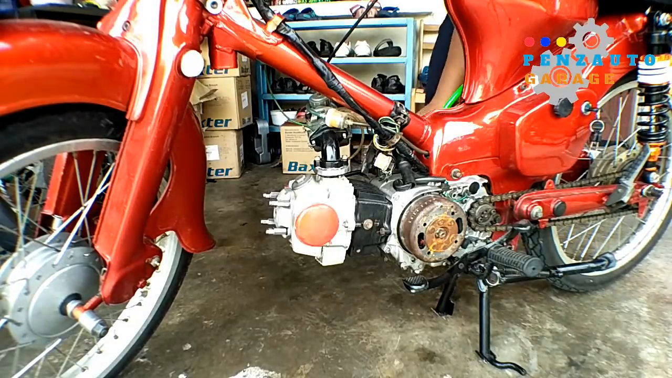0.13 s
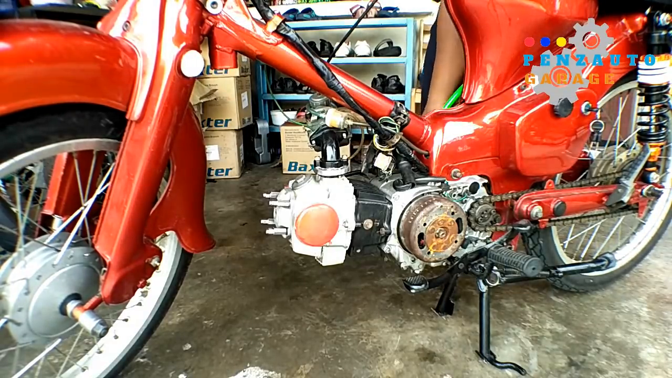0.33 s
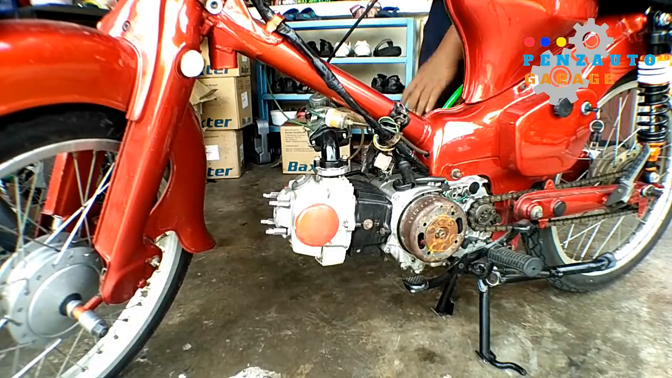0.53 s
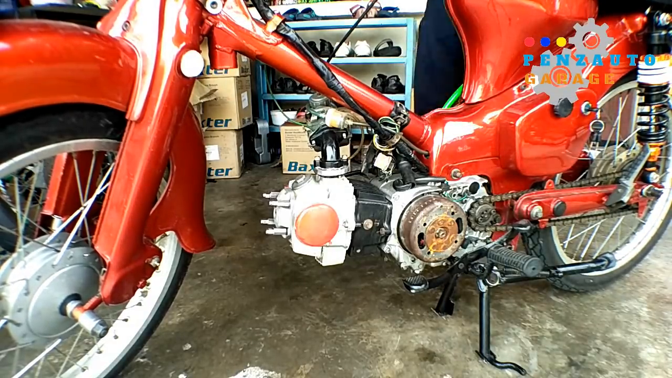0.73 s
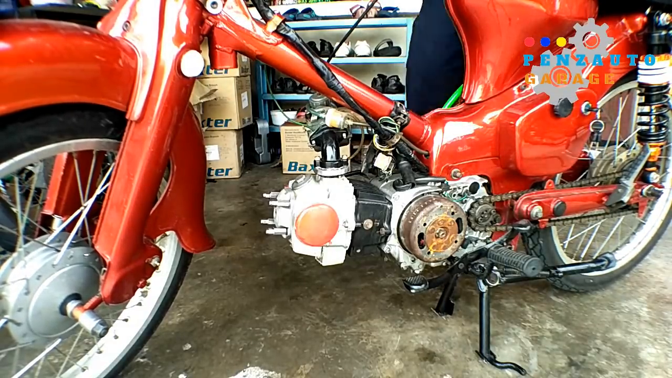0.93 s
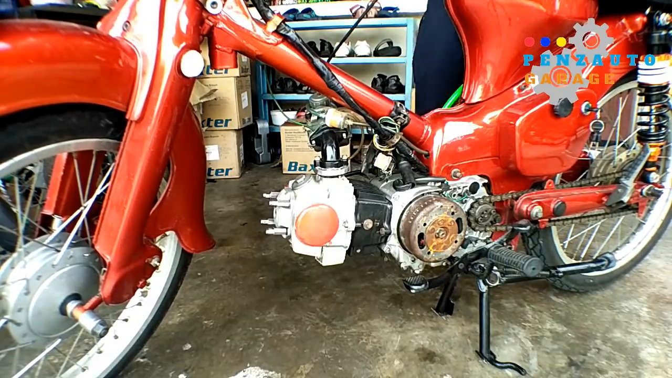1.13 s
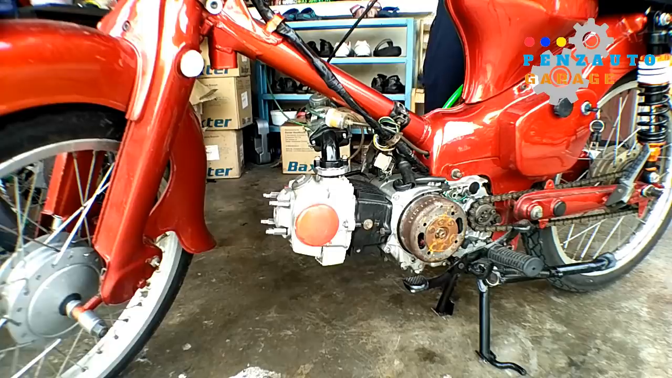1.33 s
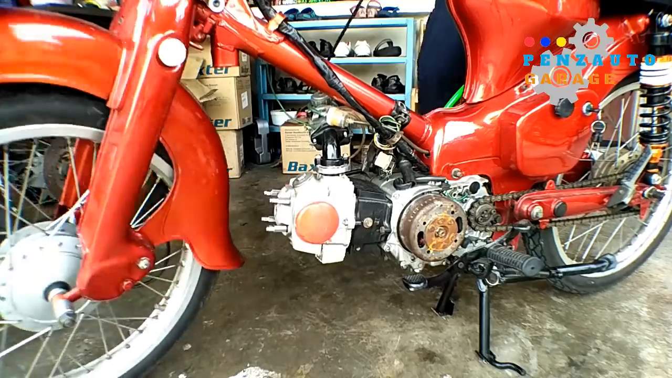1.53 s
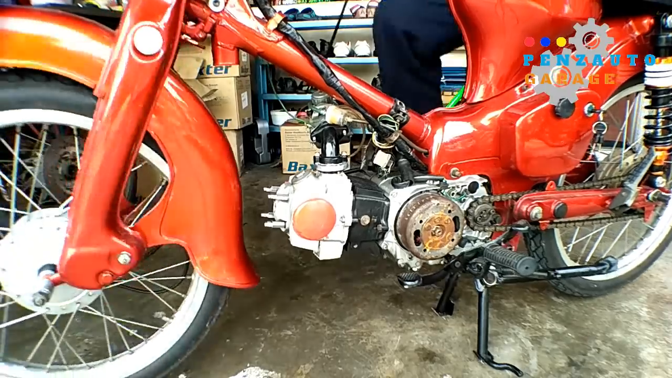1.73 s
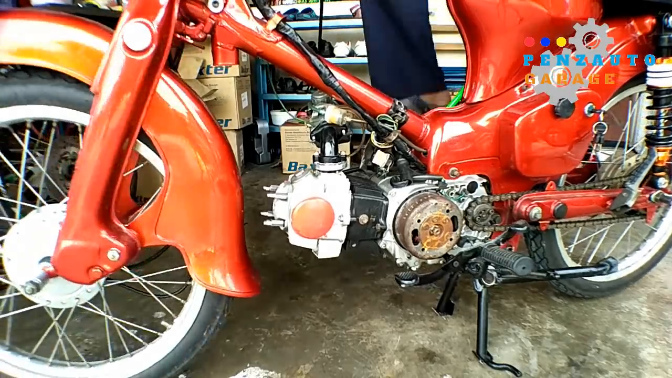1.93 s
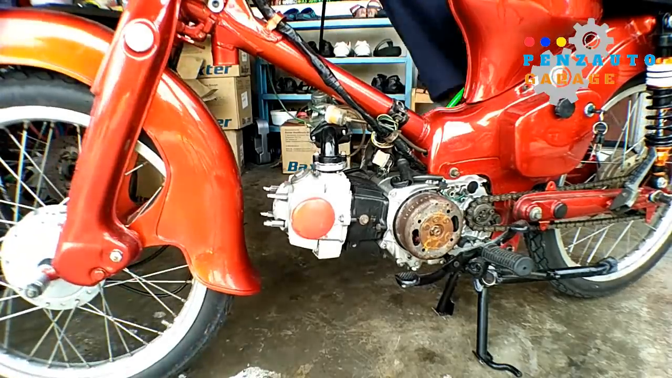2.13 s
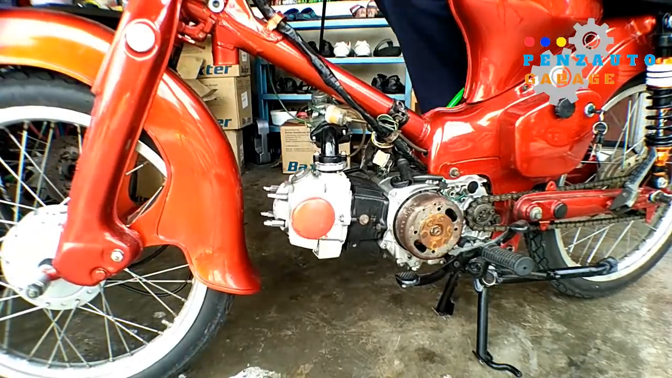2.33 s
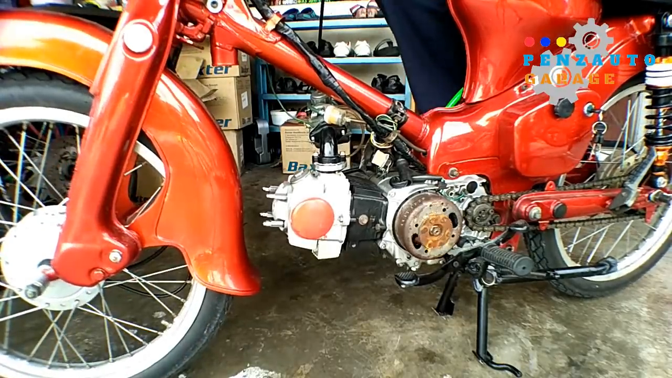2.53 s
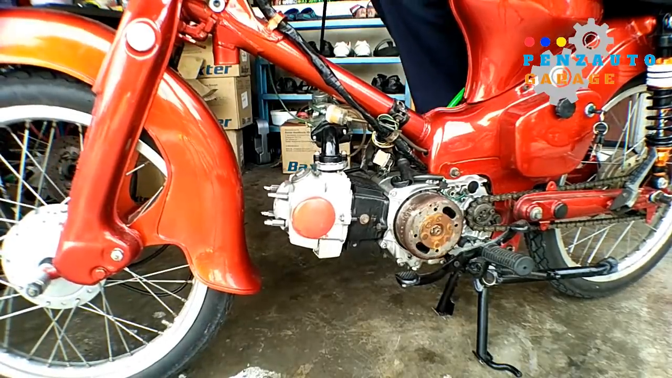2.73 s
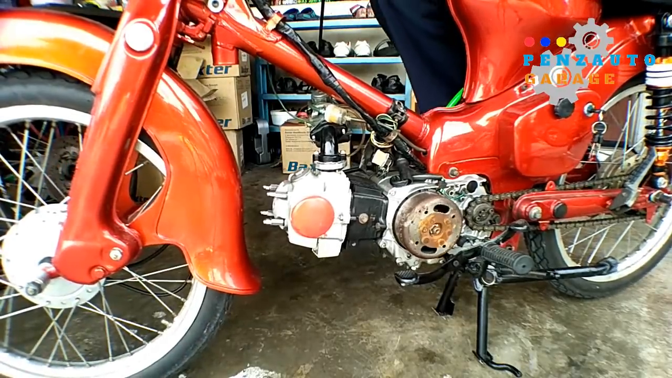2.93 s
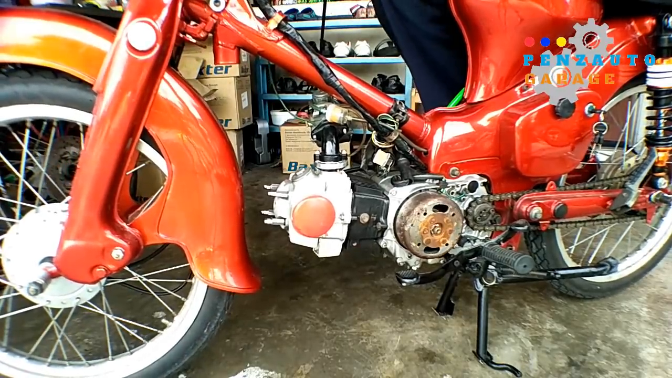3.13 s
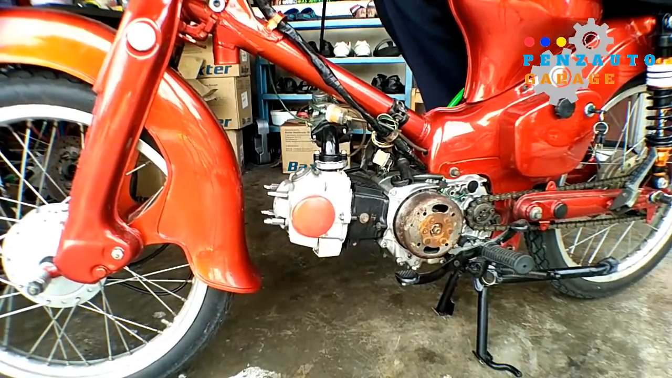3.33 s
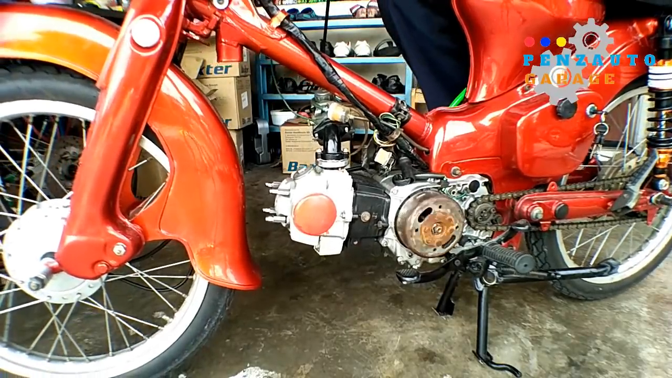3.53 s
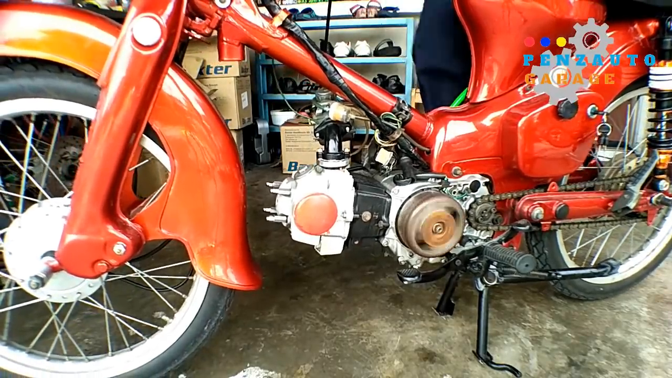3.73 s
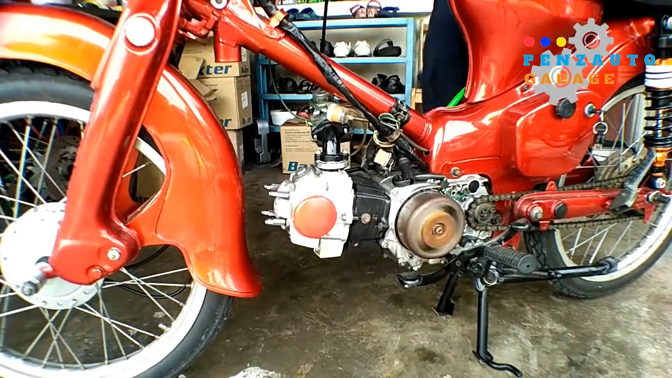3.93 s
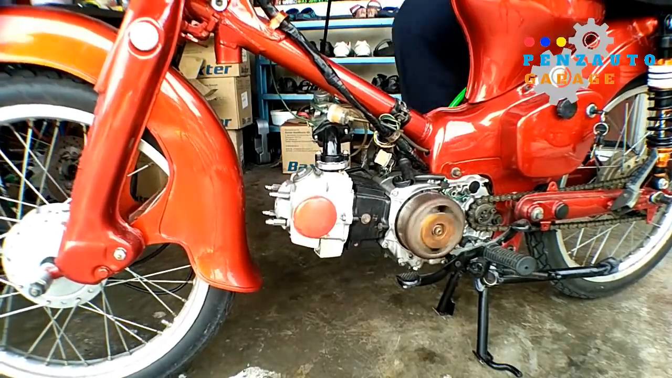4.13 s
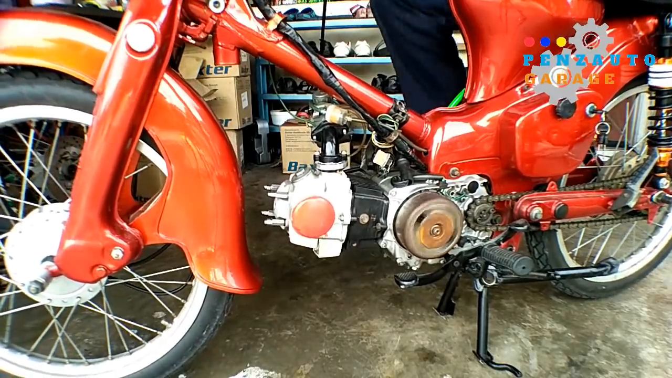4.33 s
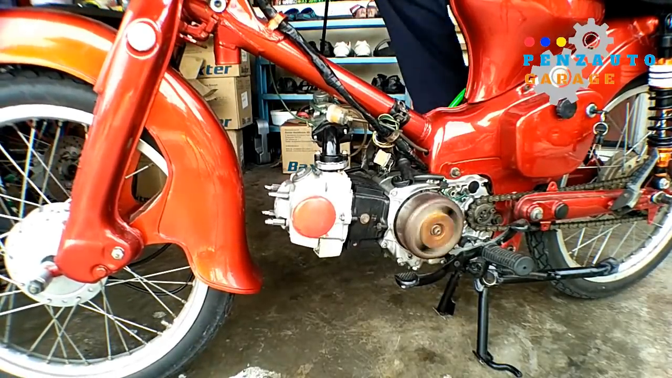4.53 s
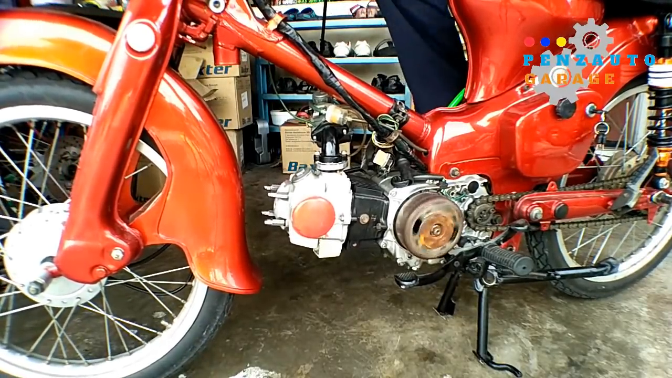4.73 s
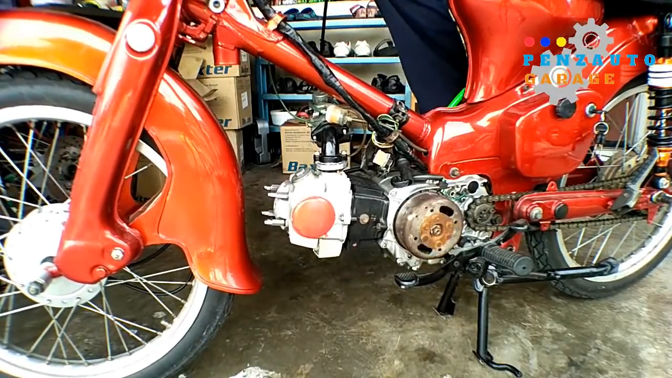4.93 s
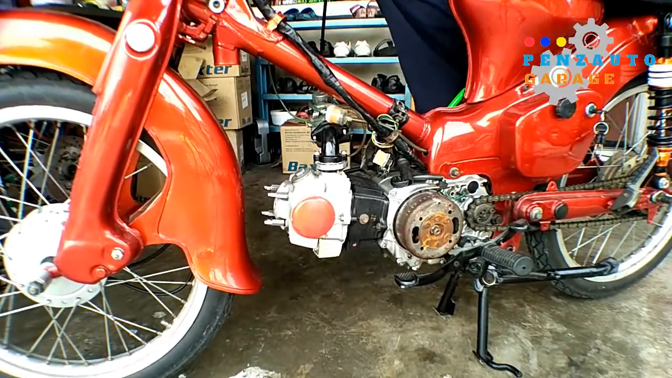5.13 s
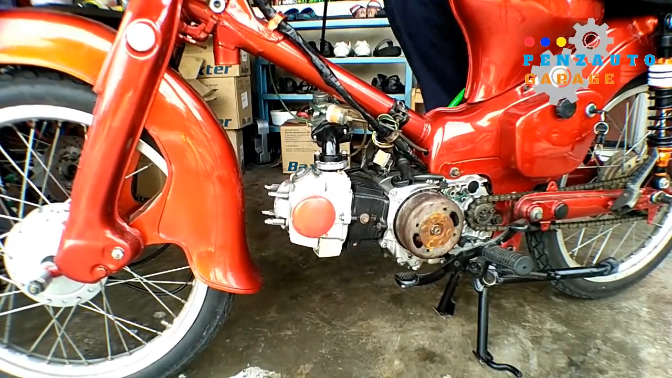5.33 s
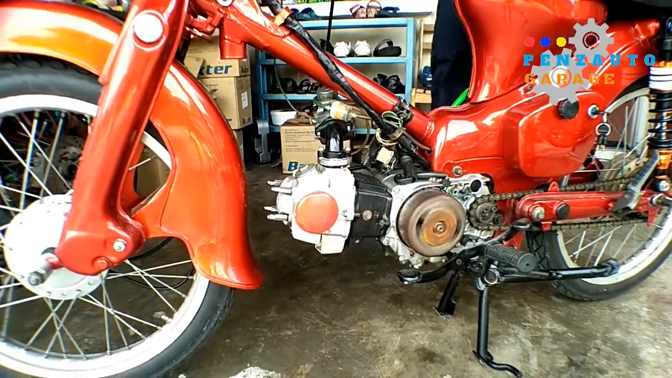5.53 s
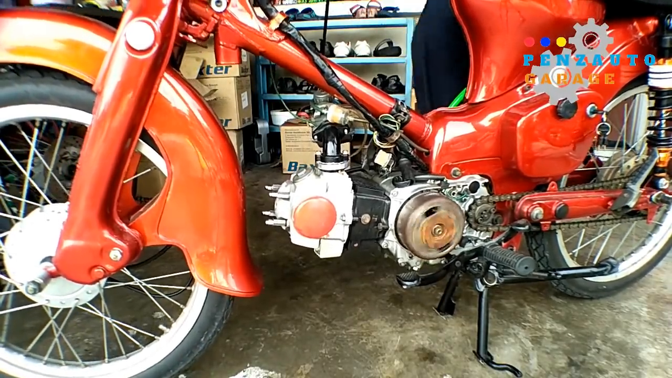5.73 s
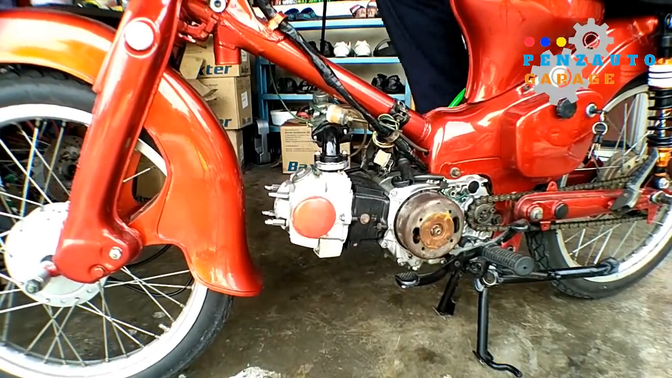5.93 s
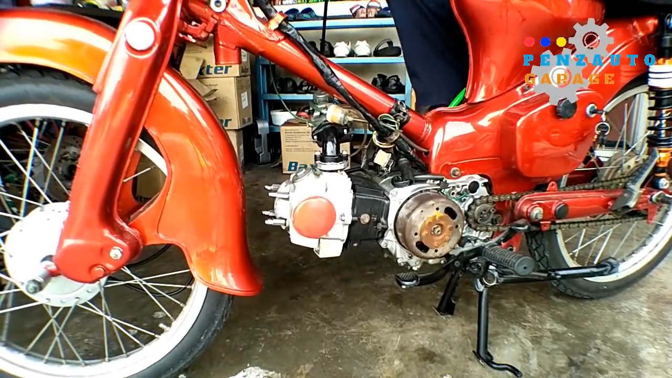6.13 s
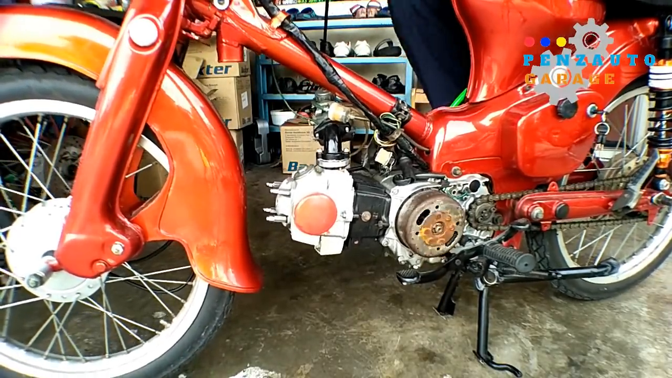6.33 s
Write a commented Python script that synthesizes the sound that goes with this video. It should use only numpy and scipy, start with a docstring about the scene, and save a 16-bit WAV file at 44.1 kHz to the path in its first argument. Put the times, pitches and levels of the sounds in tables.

```python
"""Kick-starting a small motorcycle

A small single-cylinder motorcycle is rocked on its stand and kick-started twice in a workshop.
Each firing is a swelling, dying gas pulse that thumps through the silencer; the loudest thumps clip.
Valve gear, chain and bare flywheel are shaped noise; lever and stand knocks ring the frame.
Scuffs, scrapes, a boom and a whirr are bands of noise; distant traffic drones as narrow noise."""
import sys
import numpy as np
from scipy import signal
from scipy.fft import rfft, irfft, next_fast_len
from scipy.io import wavfile
from scipy.ndimage import map_coordinates

SR = 44100
rng = np.random.default_rng(int(sys.argv[2]) if len(sys.argv) > 2 else 0)


def store_wav(level_fs):
    """Save 16-bit WAV to argv[1]."""
    pcm = np.round(np.clip(np.atleast_2d(level_fs), -1, 1) * 32767)
    wavfile.write(sys.argv[1], SR, pcm.T.astype(np.int16))


def gain_from_db(level_db):
    """Turn a decibel level (scalar or array-like) into a linear amplitude factor."""
    decades = np.asarray(level_db, float) / 20
    return 10 ** decades


N = 281358   # length in samples

# clacks of valve gear in the running engine:
# (start_s, relative crack_db, clatter_db above the crack, t60_s: time to fade by 60 dB)
CLACKS = [(3.712, -22, -7, 0.13), (3.8769, -7.5, -6, .3), (3.9011, -0.5, -7.5, .2),
          (3.9858, -2.5, -13, 0.093), (4.0843, -5, -13, .1), (4.211, -10, -4, .2), (4.321, -10, 0.5, 0.27),
          (4.35, -1, -13, 0.11), (4.627, -3.5, -10, 0.041), (4.6735, -17.5, -20, .05),
          (4.994, -10.5, -7.5, 0.22), (5.775, -13, -10, .2), (5.8802, -16, 4, 0.12), (6.0089, -17, 3, .25),
          (6.0586, -14.5, -20, 0.2)]
KICK_S = 3.4   # before this the wheel and stand move, after it the engine
PORT_LAG, BASS_LAG = 8, 13   # samples the left port hears late: lower range, deep thumps


def exhaust():
    """Each firing lets gas burst out, then the piston pushes out the rest; pipe and walls answer."""
    # firings: (start_s when the valve opens, blow_db of the burst, wait_s until the push, push_db)
    firings = [(3.7075, -18.5, 0.037, -34), (3.8795, 1.5, 0.018, -6.5), (3.9665, 1, 0.019, -10.5),
               (4.062, -1, 0.031, -10), (4.181, -4, 0.03, -11), (4.322, -1, .028, -6.5),
               (4.4455, -3, 0.029, -10.5), (4.5945, -3, 0.0409, -14), (4.736, -5.5, 0.043, -20.5),
               (5.649, -4.5, 0.028, -15), (5.797, -7.5, 0.038, -21.5)]
    # upper silencer and pipe modes struck by each burst: (pitch_hz, relative level_db, t60_s)
    pipe = [(187, -20, 0.066), (300, -34.5, 0.054), (391, -31, .07), (556, -59, .05)]
    # echoes off walls: (delay_s, level_db)
    echoes = [(0.048, -18.5), (0.074, -20.5), (.11, -49.5)]
    bark_grows = 1.75   # dB of bark and pipe modes for each dB of burst
    gas, bark = np.zeros(N), np.zeros(N)
    strikes = np.zeros((len(pipe), N))
    vary_db = rng.normal(0, 3, (len(firings), len(pipe)))
    for k, (s, blow_db, wait_s, push_db) in enumerate(firings):
        hz = 106.2 + 0.7 * blow_db   # hotter, stronger firings ring the silencer higher
        add(gas, s, gain_from_db(blow_db) * puff(hz, 0.0084, -0.16))
        add(gas, s + wait_s, gain_from_db(push_db) * puff(1.06 * hz, 0.0087, -0.42))
        fade = np.exp(-np.arange(SR // 6) / SR / 0.044)
        add(bark, s, gain_from_db(bark_grows * blow_db - 22) * fade)
        strikes[:, round((s + 0.004) * SR)] = gain_from_db(bark_grows * blow_db + 3 + vary_db[k])
    gas -= 0.17 * gas ** 2   # strong waves steepen in the pipe
    for hit, (hz, db, t60) in zip(strikes, pipe):
        gas += gain_from_db(db) * ring(hit, hz, t60)
    gas += bark * noise_band(240, 486)   # turbulent gas in the tailpipe
    gas = signal.sosfilt(signal.butter(2, 48, "high", fs=SR, output="sos"), gas)
    out = np.array([np.roll(gas, BASS_LAG), gas])
    for delay_s, db in echoes:
        late = [np.roll(gas, round((delay_s + extra_s) * SR)) for extra_s in (0.0007, 0)]
        out += gain_from_db(db) * np.array(late)
    return out


def puff(hz, peak_s, phase):
    """A gas pulse or bump: a few cycles, mainly downward at first, that swell until peak_s and die."""
    t = np.arange(SR // 6) / SR
    swell = (t / peak_s * np.exp(1 - t / peak_s)) ** 1.46
    return -swell * np.sin(2 * np.pi * hz * t + phase)


def moving_parts():
    """Dense rattle while parts move; each contact adds a dying burst and shakes the frame."""
    hits = contacts()
    power = rattle_power()
    add_bursts(power, hits)
    return sum(np.sqrt(p) * noise for p, noise in zip(power, rattle_noise())) + frame_rings(hits)


def rattle_noise():
    """Countless small contacts are rough noise, smeared by the castings' many close modes."""
    # colour of the moving parts: (pitch_hz, relative level_db per Hz)
    metal = [(150, -28), (250, -23.5), (413, -6.5), (525, -7.5), (681, -5), (897, -8.5), (1080, -6),
             (1760, -12.5), (4100, -10.5), (5600, -16), (6210, -17.5), (7250, -11.5), (8040, -17),
             (11000, -8.5), (15500, -15.5)]
    t = np.arange(SR // 3) / SR
    casing = rng.standard_normal((2, 1, len(t))) * gain_from_db(-60 * t / 0.06)   # t60 0.06 s
    # half of the sound comes straight, half through the castings
    casing[..., 0] = np.sqrt(np.sum(casing ** 2, axis=-1))
    rattle = signal.fftconvolve(rng.standard_normal((2, 2, N)), casing, axes=-1)[..., :N]
    # chain links and valve gear roughen it
    grain = gain_from_db(1.3 * np.clip(drift(200), -2, 3) + 1.8 * drift(35))
    near = np.arange(N) > KICK_S * SR
    return [rms_one(group) for group in bands(metal, rattle * grain, near, patchy_db=1.67)]


def rattle_power():
    """Power of boom, clatter and hiss; each table has one level curve and one colour."""
    # rattle as the bike rolls, in the two engine runs, and a last hit near 6.37 s: (time_s, hiss_db)
    rolling = [(1.45, -60), (1.72, -58.5), (1.75, -44), (1.81, -33.5), (1.92, -35.5), (2.36, -66)]
    first_run = [(3.66, -64), (3.72, -35.5), (3.86, -26.5), (3.92, -22), (4.3, -26.5), (4.32, -19.5),
                 (4.57, -30), (4.585, -22.5), (4.9, -32), (5.02, -46.5), (5.11, -76)]
    second_run_and_hit = [(5.37, -63.5), (5.52, -41.5), (5.65, -25), (5.76, -28), (6.08, -34),
                          (6.24, -62.5), (6.35, -57), (6.37, -36.5), (6.38, -39)]
    t, power = np.arange(N) / SR, np.zeros((3, N))
    power[2] = gain_from_db(2 * -72.5)   # faint hiss while nothing turns
    # clatter and boom, in dB above the hiss
    spells = [(rolling, 0.58, -0.82), (first_run, -7.5, -9), (second_run_and_hit, -7.5, -7.5)]
    for rows, clatter_db, boom_db in spells:
        s, db = np.transpose(rows)
        colour_db = np.array([[boom_db], [clatter_db], [0]])
        power += gain_from_db(2 * (np.interp(t, s, db, -200, -200) + colour_db))
    return power


def contacts():
    """All blows, jolts and clacks as (start_s, crack_db, clatter_db, ring_db, ring_hz, t60_s)."""
    # blows on lever, stand and frame; the pair near 396 Hz is a short growl:
    # (start_s, relative crack_db, ring_db of the frame above the crack, ring_hz, t60_s)
    blows_and_growl = [(0.169, -21.5, -23, 1480, 0.5), (0.2997, -23, -11.5, 1180, 0.21),
                       (0.3199, -29, 1, 550, 0.26), (0.8033, -42, -6, 288, 0.48),
                       (1.4432, -23.5, -7.5, 800, 0.17), (1.4905, -34.5, -6.5, 740, 0.12),
                       (1.737, -20, -13.5, 307, 0.84), (2.2844, -27, 0, 1340, 0.24),
                       (2.3074, -27.5, -3, 676, 0.24), (2.6076, -61, 25.5, 500, 0.63),
                       (2.8828, -27, -36, 614, 0.14), (2.9387, -41, -34, 366, 0.11),
                       (3.273, -30, -20, 373, 0.4), (3.5381, -41.5, 13, 734, 0.36),
                       (3.627, -37, 20, 830, 0.29), (5.3682, -34.5, -5, 1140, 1),
                       (5.414, -27.5, -5, 630, 0.65), (5.4294, -24, -2, 440, 0.08),
                       (5.5187, -20, -7.5, 990, 0.31), (5.5744, -38.5, 6, 396, 0.1),
                       (5.6032, -26.5, 4.5, 396, 0.32)]
    # jolts of chain and wheel as the bike rolls: (start_s, relative crack_db)
    jolts = [(1.7962, -9.5), (1.8637, -12.5), (1.923, -20.5), (1.967, -12), (2.006, -12), (2.05, -13.5)]
    hits = []
    for s, db, ring_db, hz, t60 in blows_and_growl:
        clatter_db = 2.8 + 0.36 * ring_db   # what rings the frame harder also clatters more
        hits.append((s, db, clatter_db, ring_db, hz, t60))
    hits += [(s, db, -4.5, -20, 615, 0.24) for s, db in jolts]
    hits += [(s, db, clatter_db, -23.5, 760, t60) for s, db, clatter_db, t60 in CLACKS]
    return hits


def add_bursts(power, hits):
    """Each contact adds a crack and a dying tail to the power of clatter and hiss."""
    t = np.arange(SR // 3) / SR
    for s, crack_db, clatter_db, _, _, t60 in hits:
        onset = 1 - np.exp(-t / (0.0022 * t60))
        shape = onset * (gain_from_db(-120 * t / t60) + 2.5 * np.exp(-t / 0.002))   # tail and crack
        for group, db in zip(power[1:], (clatter_db, 0)):
            add(group, s, gain_from_db(2 * (crack_db + db - 16)) * shape)


def frame_rings(hits):
    """Each contact shakes the modes of frame and lever, most of all those near its own pitch."""
    # frame and lever modes: (pitch_hz, relative level_db, t60_s)
    modes = [(270, -7, 0.02), (313, -22, 0.039), (398, 1.5, 0.13), (451, -8, 0.093), (582.6, 2, 0.071),
             (634, -2, 0.075), (730, -0.5, 0.089), (762, -2.5, 0.027), (862, 2, 0.016), (1012, -5.5, 0.057),
             (1080, -2, 0.15), (1180, 2, 0.027), (1326, 5.5, 0.018), (1593, 11, 0.02)]
    mode_hz = np.array(modes)[:, 0]
    t, shakes = np.arange(SR // 3) / SR, np.zeros((len(modes), N))
    vary_db = rng.normal(0, 2.5, (len(hits), len(modes)))
    for k, (s, crack_db, _, ring_db, ring_hz, t60) in enumerate(hits):
        octaves_below = np.log2(ring_hz / mode_hz)
        near_db = -13 * np.abs(octaves_below)   # the spot struck favours modes near its pitch
        near_db -= 7.4 * np.maximum(octaves_below, 0)   # lower modes are harder to move
        # a blow, then the contact chatters
        judder = (gain_from_db(-110 * t / t60) + 1.1 * np.exp(-t / 0.0015)) / np.sqrt(t60 * SR)
        for shake, db in zip(shakes, crack_db + ring_db + 9 + near_db + vary_db[k]):
            add(shake, s, gain_from_db(db) * judder)
    shakes *= rng.standard_normal(shakes.shape)
    rings = np.array([gain_from_db(db) * ring(shake, hz, t60) for shake, (hz, db, t60) in zip(shakes, modes)])
    balance = gain_from_db(rng.normal(0, 1.5, (len(modes), 1)))   # each mode beams its own way
    left, right = (rings * balance).sum(axis=0), (rings / balance).sum(axis=0)
    return np.array([np.roll(left, PORT_LAG), right])


def ticks():
    """A very short bright burst of noise where each valve lands."""
    low_hz, high_hz = 10260, 12700
    fade = np.exp(-np.arange(SR // 50) / SR / 0.0018)
    shape = np.zeros(N)
    for s, db, *_ in CLACKS:
        add(shape, s, gain_from_db(db - 5.5) * fade)
    return shape * ports(*noise_band(low_hz, high_hz, channels=2), low_hz, near=True)


def stand():
    """Stand and springs give short low bumps; a squeaky scrape is narrow noise that rises in pitch."""
    # bumps: (start_s, level_db, pitch_hz, swell_s)
    bumps = [(1.736, -29, 115, 0.028), (1.797, -25.5, 145, .008), (1.824, -29, 63.4, 0.016),
             (2.034, -28, 150, 0.0087), (2.046, -34.5, 61.5, 0.024), (2.126, -31, 55, 0.0091)]
    # the squeaky scrape: (time_s, pitch_hz, level_db)
    chirp = [(0, 4400, -45), (.05, 4950, -40), (.11, 5160, -41), (.2, 5200, -61)]
    low = np.zeros(N)
    for s, db, hz, swell_s in bumps:
        add(low, s, gain_from_db(db) * puff(hz, swell_s, 0))
    hz, chirp_db = in_time(chirp)
    playing = np.arange(N) < chirp[-1][0] * SR
    scrape = np.array([wandering_tone(hz, 520), wandering_tone(hz, 520)])
    return np.array([np.roll(low, BASS_LAG), low]) + playing * gain_from_db(chirp_db) * scrape


def noise_swells():
    """Scuffs, scrapes, a boom and a whirr: uneven noise around one pitch that swells and fades."""
    # broad scuffs of shoes and tyres:
    # (peak_s, level_db, centre_hz, fall t60_s, dull_db: the dull part relative to the bright one)
    scuff_rows = [(0.087, -31.5, 10700, 0.24, -10), (1.6, -39, 10000, 0.68, -13.5),
                  (2.588, -47.5, 11600, 0.27, -9), (4.974, -22.5, 12880, 0.25, -33),
                  (6.336, -45, 12600, .2, -8)]
    # bands of noise of various widths: scrapes, engine boom at 3.82 s, run-down whirr at 6.16 s:
    # (peak_s, level_db, centre_hz, width in octaves, fall t60_s)
    other_swells = [(.5, -52.5, 310, 0.73, 0.4), (1.331, -56, 5400, 0.87, 0.54),
                    (1.442, -43.5, 1850, 0.79, 0.1), (1.6, -45.5, 5870, 0.34, 0.42),
                    (1.93, -47.5, 3540, 0.41, 0.73), (2.19, -50, 2310, 0.7, 0.66),
                    (3.16, -65.5, 5900, 0.22, .25), (3.82, -38, 366, 0.28, 0.61), (6.16, -56, 1780, 1.4, 1),
                    (6.27, -50.5, 920, 1.3, 0.24)]
    out, t = np.zeros((2, N)), np.arange(N) / SR
    parts = [(s, db, hz, 0.96, t60) for s, db, hz, t60, _ in scuff_rows]
    parts += [(s, db + dull_db, 1300, 2.46, t60) for s, db, _, t60, dull_db in scuff_rows]
    for s, db, hz, octaves, t60 in parts + other_swells:
        rise = np.exp(-2 * ((t - s) / (0.19 * t60)) ** 2)
        shape = np.where(t < s, rise, gain_from_db(-60 * np.maximum(t - s, 0) / t60))
        mid, side = noise_band(hz * 2 ** (-octaves / 2), hz * 2 ** (octaves / 2), channels=2)
        out += gain_from_db(db + 2 * drift(60)) * shape * ports(mid, side, hz, near=s > KICK_S)
    return out


def drone():
    """A far engine's wavering note, thuds carried by the floor, deep rumble and steady hum."""
    # the far note: (time_s, pitch_hz, level_db)
    far_note = [(0, 63, -49.5), (.65, 62, -58), (.98, 55, -48.5), (1.6, 58, -54), (2.3, 66, -58),
                (3.5, 74, -57), (4.9, 76, -54), (5.4, 72, -64.5), (6.0, 68, -54.5), (6.38, 66, -64)]
    # thuds of the bike's weight through the floor: (peak_s, level_db)
    floor_thuds = [(1.84, -35), (2.05, -40.5)]
    # faint steady tones: (pitch_hz, level_db rms)
    hums = [(140, -64.5), (310, -75.5), (385, -76.5)]
    hz, note_db = in_time(far_note)
    t = np.arange(N) / SR
    # each thud rises by 203 dB and falls by 166 dB a second
    thuds = sum(gain_from_db(db + np.minimum(203 * (t - s), 166 * (s - t))) for s, db in floor_thuds)
    deep = gain_from_db(note_db) + gain_from_db(-0.5) * thuds
    note = wandering_tone(hz, 10) + gain_from_db(-14) * noise_band(11, 48)
    hum = sum(gain_from_db(db) * wandering_tone(np.full(N, f), 10) for f, db in hums)
    rumble = (gain_from_db(-63.5) + thuds) * noise_band(57, 220)
    # low rumble, opposite in the two ports, widens the sound
    opposite = deep * gain_from_db(-16) * noise_band(24.55, 200) * np.array([[1], [-1]])
    return deep * note + rumble + hum + opposite


def workshop_air():
    """The room's faint air is steady coloured noise from all round."""
    # colour of the air: (pitch_hz, relative level_db per Hz)
    air_colour = [(120, -49), (200, -7.5), (244, -30), (310, -3.5), (1560, -23), (1680, -20), (2290, -20),
                  (6470, -28.5), (11000, -24.5), (14400, -47), (15500, -43)]
    groups = bands(air_colour, rng.standard_normal((2, 2, N)), near=False, patchy_db=0.5)
    return gain_from_db(-65.5) * rms_one(groups.sum(axis=0))


def bands(spectrum, source, near, patchy_db):
    """Colour two draws of noise, split them into flickering bands and sum to boom, clatter and hiss."""
    groups, edges, size = np.zeros((3, 2, N)), np.geomspace(220, 15800, 21), next_fast_len(N)
    colour = gain_from_db(at_hz(spectrum, np.arange(1, size // 2 + 2) * SR / size))
    source = irfft(rfft(source, size) * colour, size)[..., :N]
    for k, (low, high) in enumerate(zip(edges, edges[1:])):
        sos = signal.butter(2, [low, high], "band", fs=SR, output="sos")
        mid, side = signal.sosfilt(sos, source[k % 2])   # neighbours use different draws
        hz = np.sqrt(low * high)
        group = np.searchsorted((1500, 6000), hz)   # Hz edges: boom | clatter | hiss
        groups[group] += gain_from_db(patchy_db * drift(14)) * ports(mid, side, hz, near)
    return groups


def ports(mid, side, hz, near):
    """One band at two ports: engine sound (near) has its own likeness and a level balance per band."""
    # likeness of the two channels for engine sound, and for sound from all round:
    # (pitch_hz, likeness 0-1)
    likeness = [(200, .85), (500, .6), (1000, .45), (2500, .12), (4500, .75), (7000, .86), (11000, .8),
                (13000, .3), (15000, .3)]
    diffuse = [(200, 0.3), (600, 0.24), (1500, 0), (15000, 0.21)]
    # level balance of engine sound: (pitch_hz, left minus right in dB)
    balance = [(200, 2.5), (700, 1.5), (2000, -1.5), (6000, -0.5), (10500, -0.5), (12500, 6.5),
               (15000, -23)]
    alike = np.clip(np.where(near, at_hz(likeness, hz), at_hz(diffuse, hz)), 0, 1)
    shared, opposed = np.sqrt(1 + alike) * mid, np.sqrt(1 - alike) * side
    pair = (shared + opposed * [[1], [-1]]) / np.sqrt(2)
    if hz < 4000:
        pair[0] = np.roll(pair[0], PORT_LAG)
    return pair * gain_from_db(near * at_hz(balance, hz) * np.array([[0.5], [-0.5]]))


def wandering_tone(hz, width_rate):
    """Narrow noise around a moving pitch; rms about 1."""
    turn = 2 * np.pi * np.cumsum(hz) / SR
    return drift(width_rate) * np.cos(turn) + drift(width_rate) * np.sin(turn)


def noise_band(low_hz, high_hz, channels=1):
    """Band-passed white noise, rms 1."""
    sos = signal.butter(2, [low_hz, min(high_hz, 0.45 * SR)], "band", fs=SR, output="sos")
    return rms_one(signal.sosfilt(sos, rng.standard_normal((channels, N)))).squeeze()


def drift(rate):
    """Smooth chance that changes about rate times a second; spread about 1."""
    knots = rng.standard_normal(4000)
    return map_coordinates(knots, [np.arange(N) * rate * 2 / SR], order=1, mode="wrap") * 1.22


def ring(clicks, hz, t60):
    """A unit click sets a sine of height about 1 ringing, which fades by 60 dB in t60 seconds."""
    r, w = gain_from_db(-60 / (t60 * SR)), 2 * np.pi * hz / SR
    return signal.lfilter([0, np.sin(w)], [1, -2 * r * np.cos(w), r * r], clicks + 1e-18)


def rms_one(x):
    """Scale to rms 1."""
    return x / np.sqrt(np.mean(x ** 2) + 1e-20)


def in_time(rows):
    """Table columns as one value per sample."""
    s, *columns = np.transpose(rows)
    return [np.interp(np.arange(N) / SR, s, c) for c in columns]


def at_hz(points, hz):
    """Read a table of (pitch_hz, value) at any pitch, evenly in octaves."""
    table_hz, values = np.transpose(points)
    return np.interp(np.log(hz), np.log(table_hz), values)


def add(out, s, piece):
    """Mix a short piece in at time s."""
    i = round(s * SR)
    out[i:i + len(piece)] += piece[:N - i]


def scene():
    """Motorcycle and workshop at the two ports."""
    bike = exhaust() + moving_parts() + ticks() + stand()
    return bike + noise_swells() + drone() + workshop_air()


def low_pass(x):
    """Removes everything above the highest recorded frequency."""
    return signal.sosfilt(signal.butter(12, 15760, fs=SR, output="sos"), x)


def record(dry):
    """The converter clips hard at full scale."""
    clipped = np.clip(dry, -1, 1)
    return low_pass(clipped)


dry = scene()
out = record(dry)
store_wav(out)
```